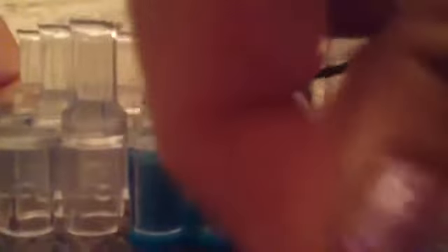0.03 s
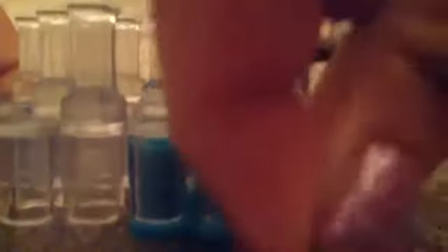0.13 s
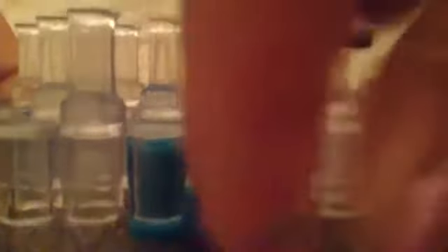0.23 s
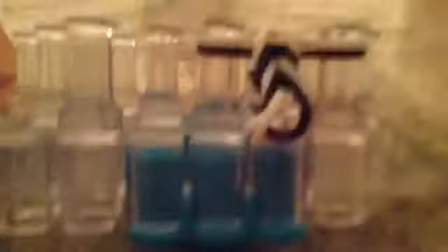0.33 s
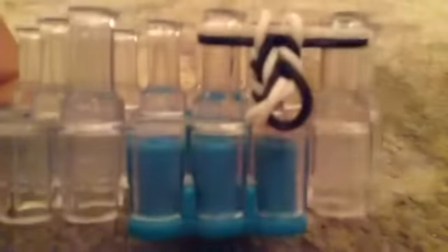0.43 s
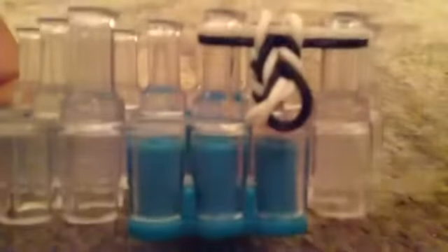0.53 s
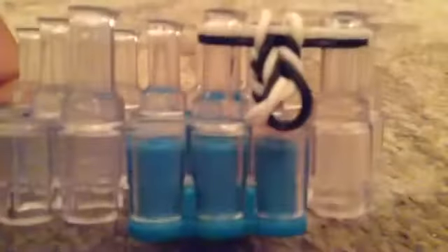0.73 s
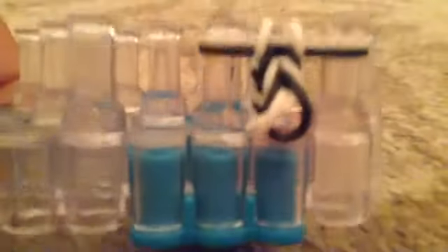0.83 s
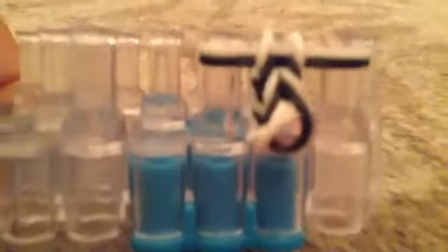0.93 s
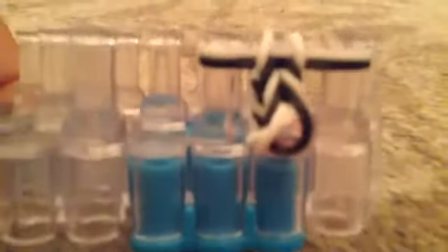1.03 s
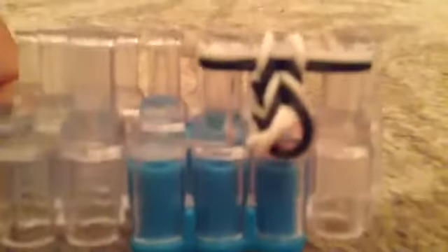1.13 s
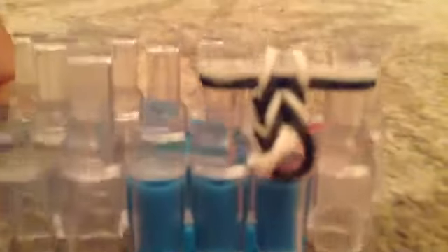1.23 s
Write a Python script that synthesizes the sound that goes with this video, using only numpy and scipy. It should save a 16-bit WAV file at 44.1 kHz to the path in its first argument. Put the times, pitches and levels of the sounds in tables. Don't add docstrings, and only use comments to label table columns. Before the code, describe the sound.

A plastic hook working rubber bands on a small peg loom: faint tick, light knock, brief scraping, then one loud bright snap with a low thump, small clicks fading into dull room hum, close phone microphone.

```python
import sys
import numpy as np
from scipy import signal
from scipy.fft import rfft, irfft
from scipy.io import wavfile

SR = 44100
rng = np.random.default_rng(int(sys.argv[2]) if len(sys.argv) > 2 else 0)


def to_wav(sig):
    pcm = np.clip(np.atleast_2d(sig), -1, 1) * 32767
    pcm = np.round(pcm).astype(np.int16)
    wavfile.write(sys.argv[1], SR, pcm.T)


def level_to_linear(level):
    exponent = np.asarray(level, float) / 20
    return 10 ** exponent


N = 57330

# time_s, level_db
HUM_LEVEL = [(0, -50.5), (.1, -53), (.2, -52), (.27, -51.5), (.45, -55.5), (.52, -52.5), (.58, -49),
             (.66, -56.5), (.75, -56), (.81, -58.5), (.85, -54), (.95, -52), (1.02, -54), (1.08, -49.5),
             (1.14, -56), (1.22, -55), (1.27, -59), (1.3, -54)]
# freq_hz, density_db
HUM_COLOUR = [(110, -18.5), (160, -7.5), (215, -3), (320, 1), (405, -19), (600, -15.5), (950, -25),
              (1350, -29)]
HUM_PATCHY_DB, HUM_GAIN_DB = 1.16, 2.5
# freq_hz, density_db
HISS_COLOUR = [(300, 1), (1500, 0), (4000, -1), (13000, -4), (15000, -4.5)]
HISS_DB = -72.5
# time_s, level_db
RUMBLE_LEVEL = [(0, -68), (.05, -76), (.26, -58.5), (.31, -52), (.38, -60), (.5, -61), (.555, -46),
                (.65, -56.5), (.8, -82), (.96, -59), (1.05, -73.5), (1.3, -74)]
# freq_hz, density_db
RUMBLE_COLOUR = [(30, 7), (60, 4), (110, -3.5), (160, 4.5), (210, -11.5)]
RUMBLE_GAIN_DB = 7.5
# time_s, level_db
RUB_LEVEL = [(0, -71), (.16, -76), (.18, -59), (.215, -53.5), (.26, -62), (.305, -53.5), (.37, -61),
             (.39, -48), (.44, -49), (.47, -60.5), (.52, -66.5), (.62, -72), (.7, -103.5), (1.3, -95.5)]
# freq_hz, density_db
RUB_COLOUR = [(500, 6.5), (1500, 0), (4000, -5), (7000, -11.5), (15000, -18)]
ROOM_DB, ROOM_T60_S, ROOM_CUT_HZ = -28.5, 0.083, 2000
SLIP_STARTS = [
    .194,
    .2025,
    .286,
    .291,
    .292,
    .2955,
    .300,
    .406,
    .420,
]
# length_s, level_db, centre_hz
SLIPS = [(0.0066, -42, 1600), (0.008, -48, 2900), (0.028, -45, 6500), (0.0063, -36, 7200),
         (0.019, -41, 2500), (0.0051, -27.5, 6170), (0.0049, -32.5, 4800), (0.0084, -45.5, 9500),
         (0.009, -47, 5800)]
SLIP_WIDTH, SLIP_GRAIN_DB = 0.4, 4.0
# freq_hz, level_db, t60_s
BASE_MODES = [(248.4, -16.5, .025), (340, -6.5, 0.031), (507, -14.5, .03), (695, -17.5, .03),
              (1039, -18, 0.017), (1684, -11, 0.0047)]
SNAP_S = 0.4136
# start_s, level_db, pitch_hz, t60_s
KNOCKS = [(.016, -36, 717, 0.018), (.1950, -22.5, 690, 0.0145), (0.1956, -27.5, 218, 0.018),
          (0.2031, -26, 270, .025), (0.2041, -23, 170, 0.036), (0.2958, -27, 294, .03),
          (.298, -35.5, 907, 0.029), (.302, -38.5, 595, .02), (.310, -36.5, 195.7, .15),
          (0.3494, -35, 902, .015), (.372, -40, 614, .03), (.397, -32.5, 340, .04), (.423, -39, 508, .03),
          (.437, -29, 280, 0.048), (.466, -37.5, 271, 0.067), (.479, -26.5, 430, 0.0116),
          (.484, -24, 560, 0.0067), (0.836, -42, 287.6, 0.064)]
KNOCK_CUT_HZ = 1900
# freq_hz, level_db, t60_s
FLICK_MODES = [(914, -19, .010), (1230, -21, 0.0084), (1920, -16.5, 0.0046), (2400, -19, 0.0046),
               (4760, -20, 0.0039)]
FLICK_S, FLICK_CUT_HZ = 0.2008, 4750
# start_s, level_db, contact_hz, spread_octaves
TICKS = [(0.0176, -44.5, 1000, 0.31), (0.2016, -44, 8000, .6), (.2043, -31, 4000, .8),
         (0.2074, -39, 5500, 1.1), (.2325, -49.5, 5000, 0.37), (.244, -58, 7000, .9),
         (.272, -51, 7000, 0.42), (.276, -52, 12000, .9), (.3065, -43, 4000, 0.73), (.320, -40, 3700, .6),
         (.347, -49, 5500, .9), (.350, -34, 2600, 1.2), (0.387, -41, 4500, 0.23), (.3925, -42, 4000, 0.32),
         (0.3954, -37, 4000, 0.48), (.4126, -20, 3197, .6), (.413, -13.5, 5056, .5),
         (0.4129, -18, 12000, 0.68), (.4139, -20.5, 9000, 1.5), (0.421, -32, 4000, .5),
         (0.426, -32, 3800, .5), (0.4314, -31.5, 11000, 1.2), (0.4493, -36.5, 6000, 1.5),
         (.4695, -48, 3700, 0.29), (.4845, -38, 1500, 0.88), (.4945, -46.5, 8000, 1.6),
         (.541, -56.5, 4000, 0.69), (0.976, -57, 4000, 0.53)]
# freq_hz, level_db, t60_s
PEG_MODES = [(1053, 4.5, 0.012), (1790, 1, 0.0038), (2300, -1.5, .004), (3040, -5, .004),
             (3780, -1.5, 0.0032), (4300, -6.5, 0.0034), (4923, -2.5, 0.0043), (5600, -2, 0.0018),
             (7000, -5, 0.0054), (8340, -2, 0.005), (9630, -2.5, 0.0052), (11700, -7, .003),
             (12800, -5.5, .003), (14900, -4, .003)]
PEG_SPREAD_DB, CHATTER_S = 2.5, 0.0003
LOW_CUT_HZ, TOP_CUT_HZ = 138, 15300


def rms_one(x):
    return x / np.sqrt(np.mean(x ** 2) + 1e-20)


def in_time(rows):
    time_s, value = np.transpose(rows)
    return np.interp(np.arange(N) / SR, time_s, value)


def drift(rate_hz):
    step = 40
    pole = np.exp(-2 * np.pi * step * rate_hz / SR)
    noise = rng.standard_normal(N // step + 2002)
    slow = signal.lfilter([1], [1, -2 * pole, pole * pole], noise)[2000:]
    return np.interp(np.arange(N) / step, np.arange(len(slow)), rms_one(slow))


def coloured(points, patchy_db):
    hz, db = np.transpose(points)
    f = np.maximum(np.fft.rfftfreq(N, 1 / SR), 1)
    octaves_outside = np.log2(np.maximum(hz[0] / f, f / hz[-1]).clip(1))
    slope_db = np.interp(np.log(f), np.log(hz), db) - 24 * octaves_outside
    spectrum = rfft(rng.standard_normal(N)) * level_to_linear(slope_db)
    place = 3 * np.log2(f / 30)
    shared = drift(25)
    out = 0
    for k in range(29):
        band = irfft(spectrum * np.clip(1 - abs(place - k), 0, 1), N)
        out = out + band * level_to_linear(patchy_db * (0.6 * shared + drift(12)))
    return rms_one(out)


def ring(hz, t60_s):
    t = np.arange(4096) / SR
    return np.sin(2 * np.pi * hz * t) * np.exp(-np.log(1000) * t / t60_s)


def ring_modes(modes):
    return sum(level_to_linear(db) * ring(hz, t60_s) for hz, db, t60_s in modes)


def lowpass(x, order, cut_hz):
    return signal.lfilter(*signal.butter(order, cut_hz, fs=SR), x)


def add(out, start_s, x):
    i = int(start_s * SR)
    out[i:i + len(x)] += x[:N - i]


def mic_hiss():
    return level_to_linear(HISS_DB) * coloured(HISS_COLOUR, patchy_db=0.3)


def room_hum():
    return level_to_linear(in_time(HUM_LEVEL) + HUM_GAIN_DB) * coloured(HUM_COLOUR, HUM_PATCHY_DB)


def table_rumble():
    return level_to_linear(in_time(RUMBLE_LEVEL) + RUMBLE_GAIN_DB) * coloured(RUMBLE_COLOUR, patchy_db=3.5)


def rubbing():
    return level_to_linear(in_time(RUB_LEVEL)) * coloured(RUB_COLOUR, patchy_db=1.8)


def room(x):
    t = np.arange(SR // 2) / SR
    decay = np.exp(-np.log(1000) * t / ROOM_T60_S) * (t > 0.004)
    tail = lowpass(rng.standard_normal(len(t)) * decay, 1, ROOM_CUT_HZ)
    return level_to_linear(ROOM_DB) * signal.fftconvolve(x, tail / np.sqrt(np.sum(tail ** 2)))[:N]


def band_slips():
    out = np.zeros(N)
    t = np.arange(1024) / SR
    for start_s, (length_s, db, hz) in zip(SLIP_STARTS, SLIPS):
        grains = rng.standard_normal(len(t))
        grains = grains * level_to_linear(SLIP_GRAIN_DB * rng.standard_normal(len(t)))
        edges_hz = [hz / (1 + SLIP_WIDTH), min(hz * (1 + SLIP_WIDTH), 20000)]
        resonance = signal.butter(2, edges_hz, "band", fs=SR, output="sos")
        x = rms_one(signal.sosfilt(resonance, grains))
        swell = np.sin(np.pi * np.clip(t / length_s, 0, 1)) ** 2
        add(out, start_s, level_to_linear(db) * x * swell)
    return out


def base_thumps():
    out = np.zeros(N)
    add(out, SNAP_S, ring_modes(BASE_MODES))
    for start_s, db, hz, t60_s in KNOCKS:
        add(out, start_s, level_to_linear(db) * ring(hz, t60_s))
    return lowpass(out, 2, KNOCK_CUT_HZ)


def hook_flick():
    out = np.zeros(N)
    add(out, FLICK_S, ring_modes(FLICK_MODES))
    return lowpass(out, 2, FLICK_CUT_HZ)


def peg_ticks():
    out = np.zeros(N)
    chatter_decay = np.exp(-np.arange(128) / SR / CHATTER_S)
    for start_s, db, contact_hz, spread in TICKS:
        x = 0
        for k, (hz, mode_db, t60_s) in enumerate(PEG_MODES):
            gain = level_to_linear(mode_db + PEG_SPREAD_DB * rng.standard_normal())
            nearness = np.exp(-(np.log2(hz / contact_hz) / spread) ** 2)
            x = x + (-1) ** k * gain * nearness * ring(hz, t60_s)
        chatter = rng.standard_normal(128) ** 3 * chatter_decay
        x = lowpass(np.convolve(x, chatter), 2, min(contact_hz * 2 ** spread, 20000))
        add(out, start_s, level_to_linear(db) * x / abs(x).max())
    return out


def scene():
    loom = peg_ticks() + hook_flick() + base_thumps() + band_slips()
    background = rubbing() + room_hum() + mic_hiss() + table_rumble()
    return (loom + room(loom) + background)[None]


def low_pass(x):
    return signal.sosfilt(signal.butter(12, 16450, fs=SR, output="sos"), x)


def record(dry):
    low_cut = signal.butter(4, LOW_CUT_HZ, "high", fs=SR, output="sos")
    top_cut = signal.cheby1(8, 1, TOP_CUT_HZ, fs=SR, output="sos")
    x = signal.sosfilt(low_cut, dry)
    x = signal.sosfilt(top_cut, x)
    return low_pass(x)


dry = scene()
out = record(dry)
to_wav(out)
```